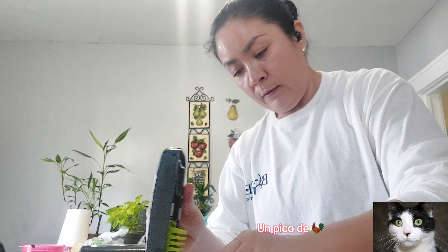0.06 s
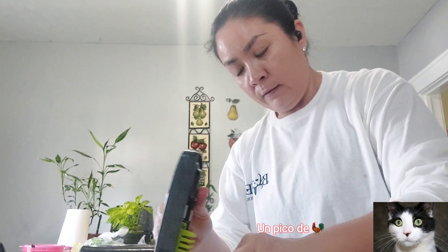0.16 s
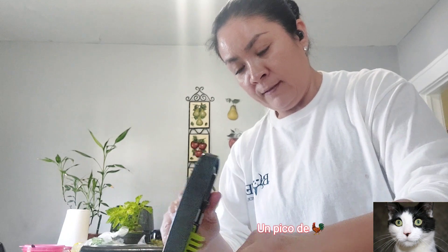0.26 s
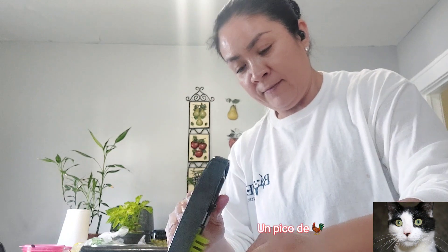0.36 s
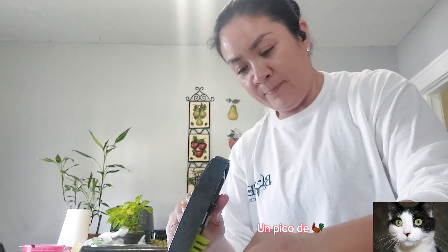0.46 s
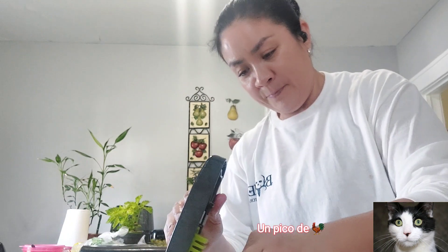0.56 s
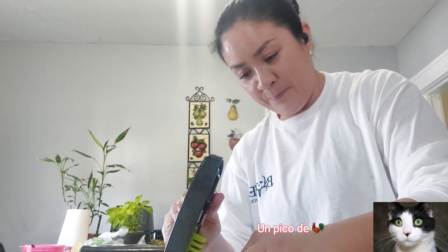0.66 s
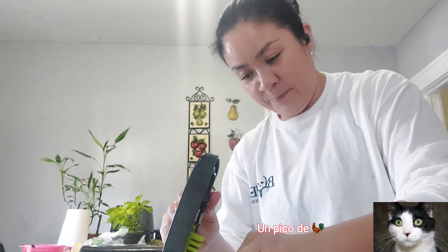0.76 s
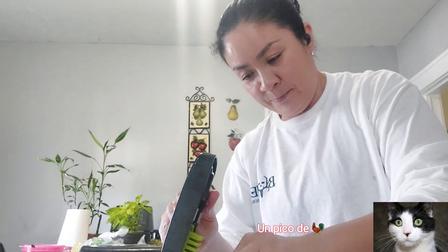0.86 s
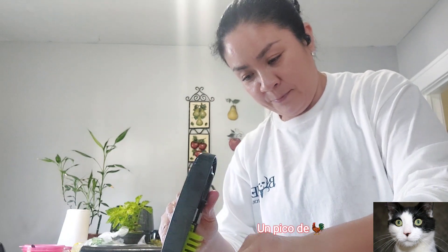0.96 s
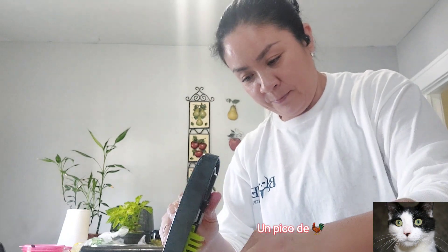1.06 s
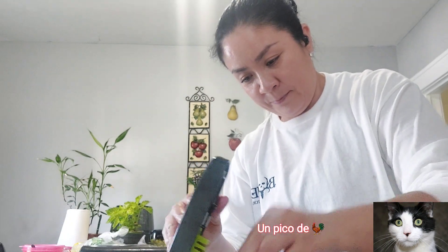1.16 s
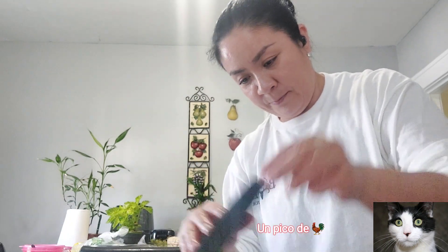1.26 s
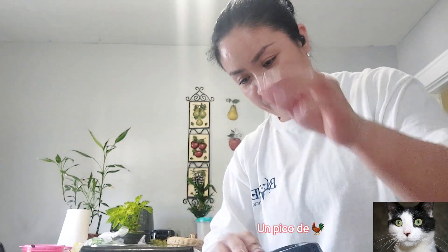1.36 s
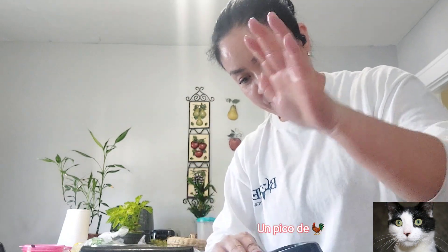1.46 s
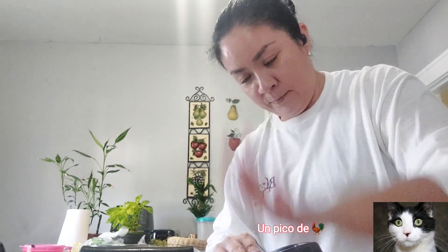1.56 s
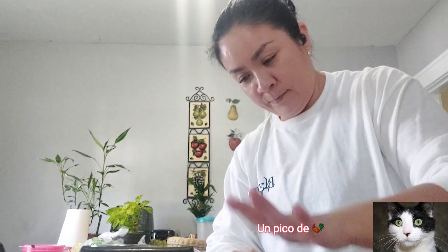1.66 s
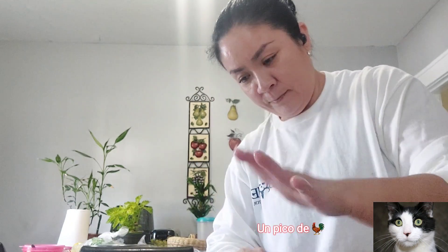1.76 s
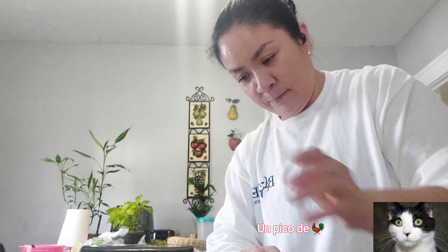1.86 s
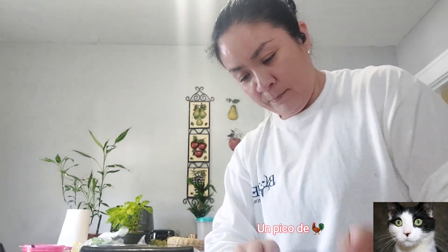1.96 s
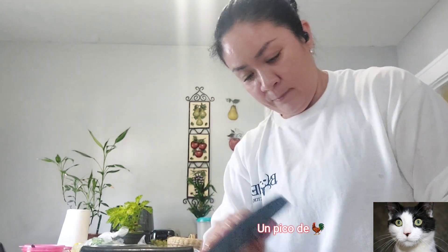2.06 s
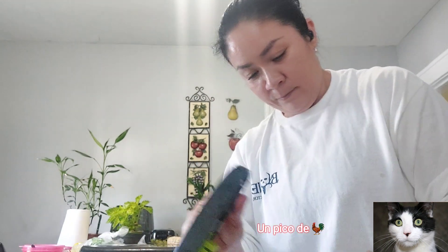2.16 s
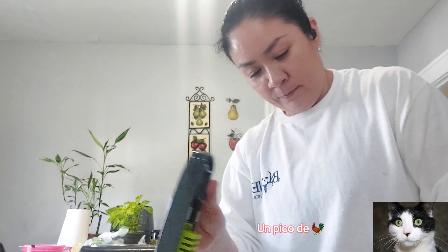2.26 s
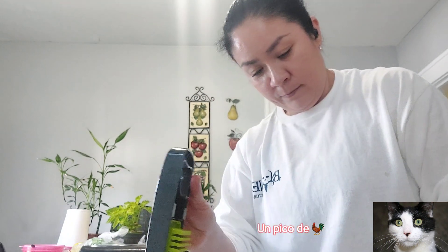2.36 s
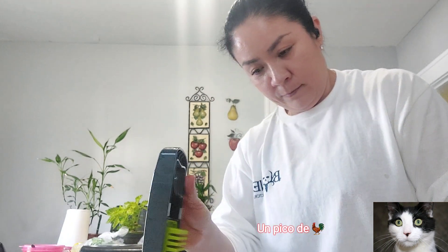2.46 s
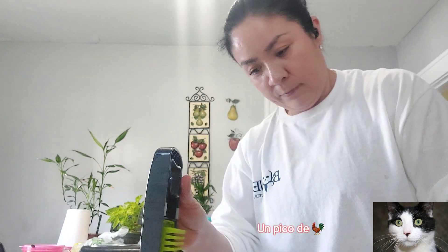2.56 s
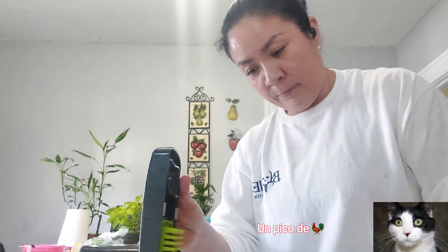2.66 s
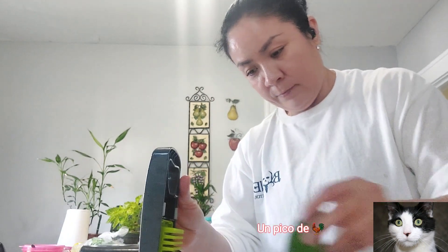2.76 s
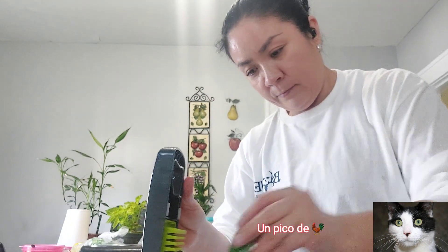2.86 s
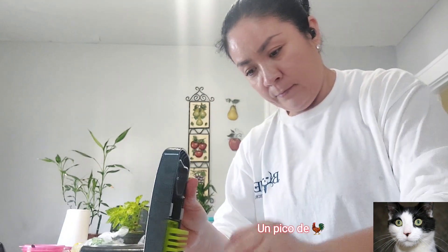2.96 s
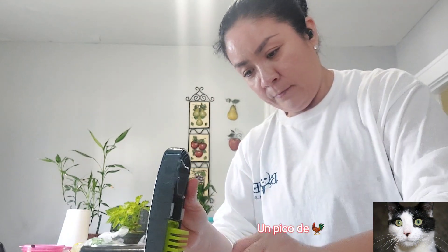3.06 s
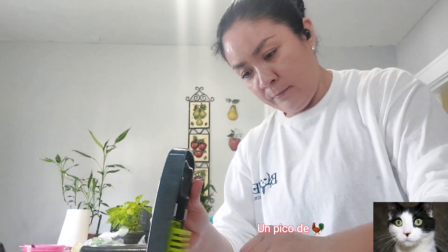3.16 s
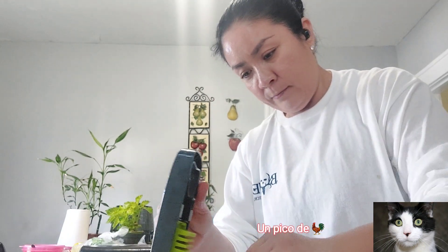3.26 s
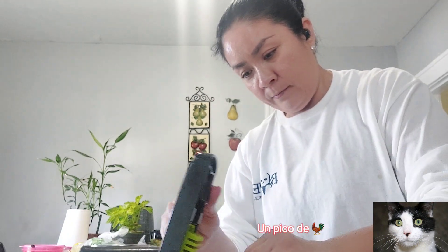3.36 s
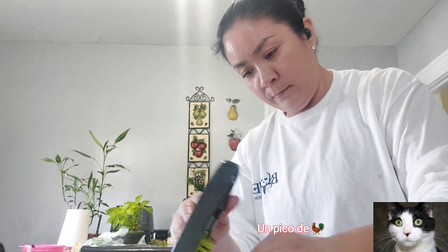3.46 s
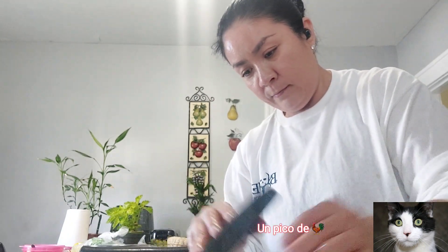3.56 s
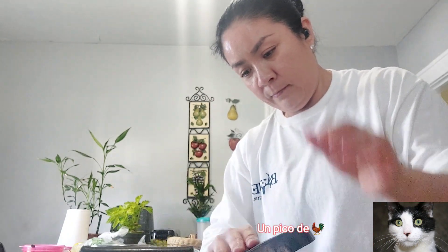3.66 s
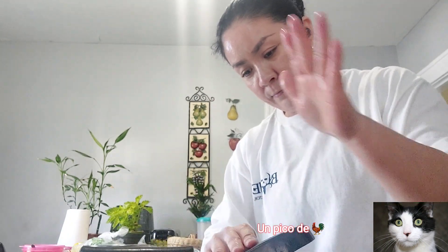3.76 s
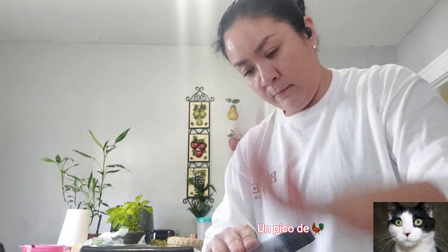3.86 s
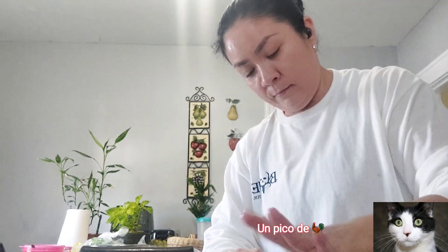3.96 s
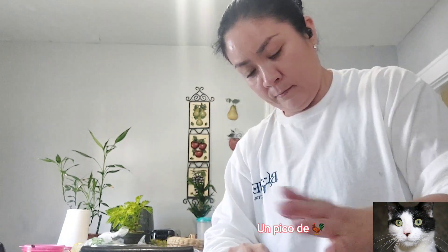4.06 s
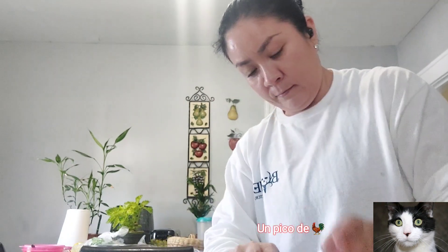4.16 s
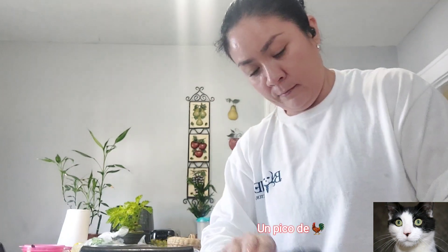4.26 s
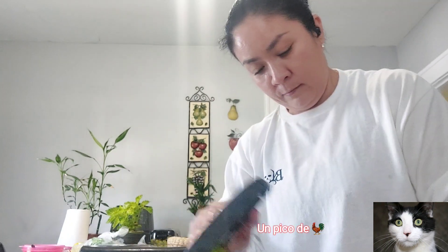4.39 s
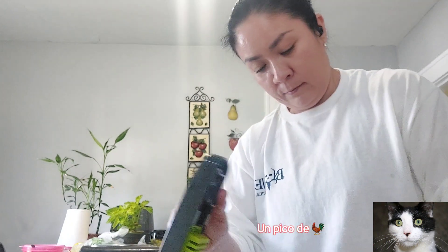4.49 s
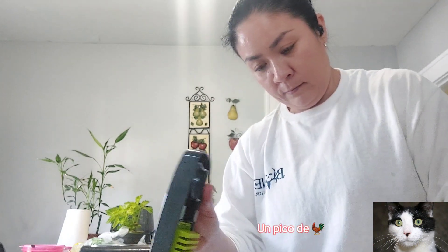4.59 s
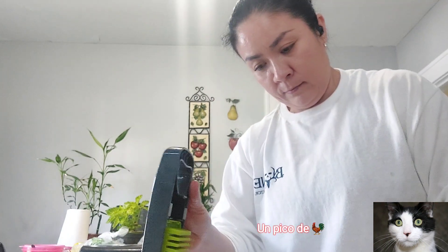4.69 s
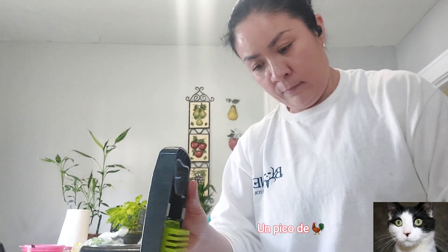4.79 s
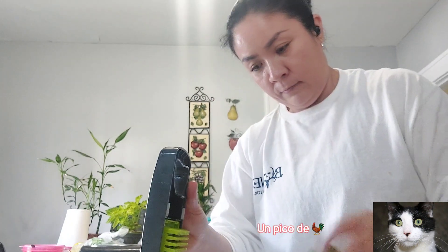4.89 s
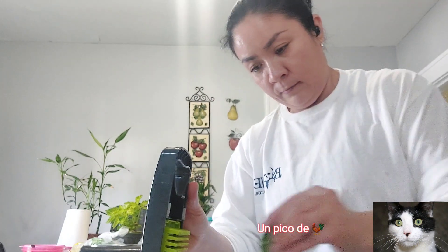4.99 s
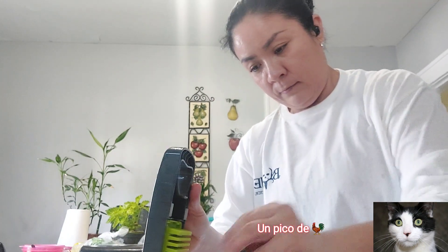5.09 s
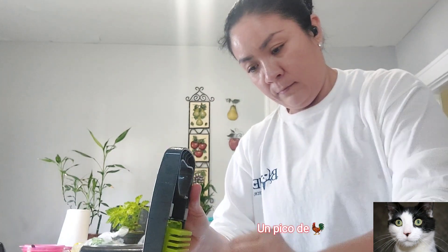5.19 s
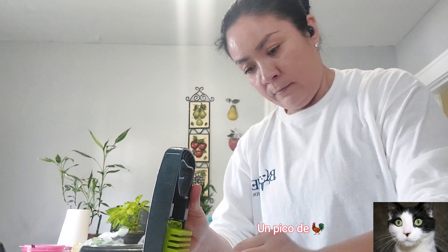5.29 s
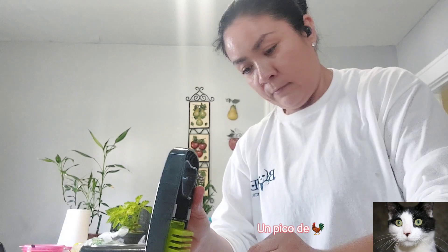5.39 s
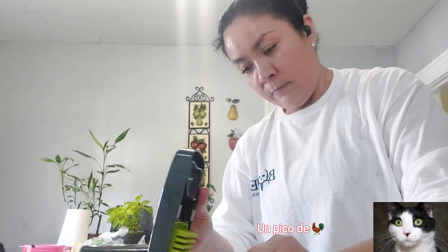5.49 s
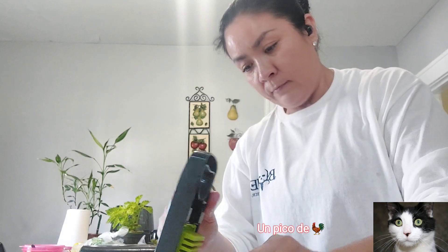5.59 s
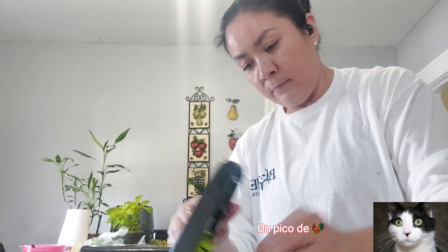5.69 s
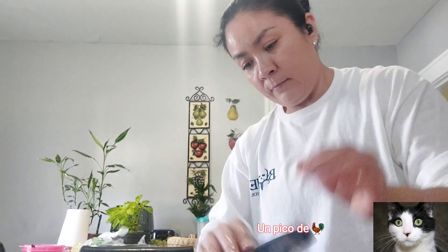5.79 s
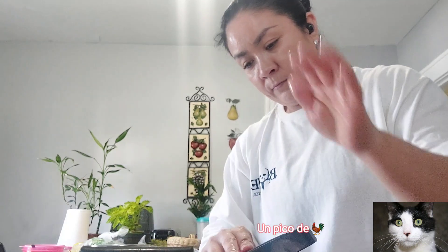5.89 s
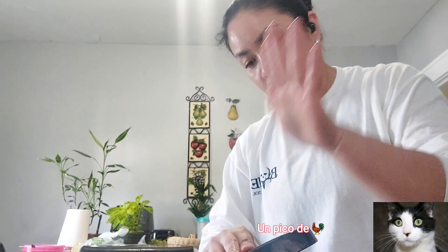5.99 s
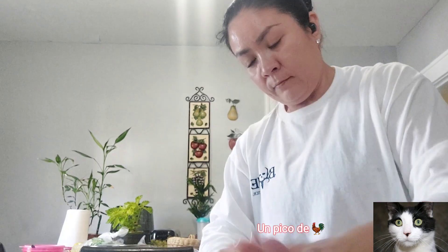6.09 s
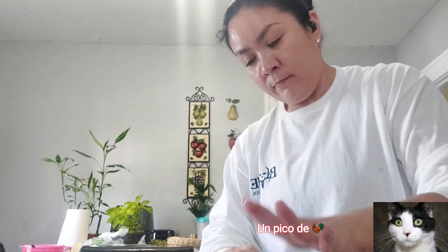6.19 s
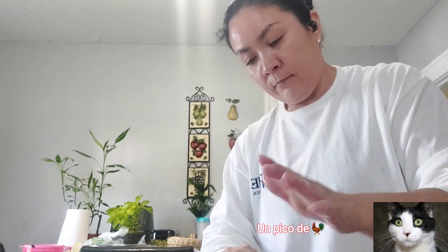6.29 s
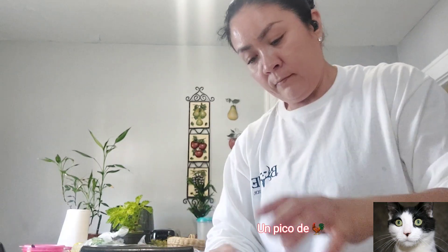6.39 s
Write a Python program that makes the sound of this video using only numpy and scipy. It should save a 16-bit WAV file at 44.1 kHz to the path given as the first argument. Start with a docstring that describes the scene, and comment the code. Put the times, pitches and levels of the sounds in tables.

```python
"""Chopping vegetables in a kitchen

Pieces are laid on the blade grid of a plastic lever chopper. Three times the lid is lowered and
slapped shut: palm, crunch, and the clack of the lid on its frame. The lid rattles as it is lifted.
The counter booms, something hollow on it rings on, the room reverberates and an appliance hums."""
import sys
import numpy as np
from scipy import signal
from scipy.fft import rfft, irfft
from scipy.io import wavfile
from scipy.ndimage import uniform_filter1d

SR = 44100
rng = np.random.default_rng(int(sys.argv[2]) if len(sys.argv) > 2 else 0)


def wav_record(signal):
    """Record a signal, one row per channel, as 16-bit PCM in the file named by sys.argv[1]."""
    frames = np.transpose(np.atleast_2d(signal))
    bounded = np.clip(frames, -1, 1)
    # unit amplitude maps onto the largest positive 16-bit level
    quanta = np.round(bounded * 32767).astype(np.int16)
    wavfile.write(sys.argv[1], SR, quanta)


N = 284004
TIME = np.arange(N) / SR
AGE = TIME[:SR * 3 // 5]  # seconds since a hit


def from_db(db):
    """Turn decibels into a gain to multiply by."""
    return 10 ** (np.asarray(db) / 20)


def unit_power(x):
    """Scale a signal to an average power of 1."""
    return x / np.sqrt(np.mean(x ** 2) + 1e-20)


def at_hz(table, hz, column=1):
    """Look up a frequency in a table, blending between its rows."""
    table = np.array(table)
    return np.interp(np.log(np.maximum(hz, 1)), np.log(table[:, 0]), table[:, column])


def add(out, time, sound):
    """Mix a sound in, starting at a time in seconds."""
    start = round(time * SR)
    out[:, start:start + sound.shape[-1]] += sound[..., :N - start]


def panned(db):
    """Two gains that make the left side db louder than the right."""
    return from_db(np.array([[db], [-db]]) / 2)


def stereo(mid, side, likeness):
    """Blend two unrelated signals into left and right (likeness 1 = same, -1 = opposite)."""
    likeness = np.clip(likeness, -1, 1)
    shared, apart = np.sqrt(1 + likeness) * mid, np.sqrt(1 - likeness) * side
    return np.array([shared + apart, shared - apart]) / np.sqrt(2)


def flicker(rate):
    """A random wobble of size about 1 that changes rate times a second."""
    return np.interp(TIME * rate, np.arange(20000), rng.standard_normal(20000))


def fade(ring_time, t=AGE):
    """Die away by 60 dB over the ring time."""
    return np.exp(-np.log(1000) * t / ring_time)


def tone(hz, ring_time, t=AGE):
    """One fading tone of a struck object."""
    return np.sin(2 * np.pi * hz * t) * fade(ring_time, t)


def rise(seconds):
    """A soft start, about two thirds of the way up after the given time."""
    return 1 - np.exp(-AGE / seconds)


def swell(time, width):
    """A short bell-shaped swell around a time."""
    out, near = np.zeros(N), np.abs(TIME - time) < 10 * width
    out[near] = np.exp(-.5 * ((TIME[near] - time) / width) ** 2)
    return out


# how alike a noise is on the left and right: (frequency [Hz], likeness [-1 to 1])
LIKENESS = [(60, 0.52), (600, .85), (1000, 0.12), (1450, -0.52), (2000, -0.084), (2800, 0.36),
            (5000, 0.039), (16000, 0.33)]

def noise(colour):
    """Steady stereo noise of power 1, shaped by a table of frequencies and levels."""
    hz = np.fft.rfftfreq(N, 1 / SR)
    mid, side = rfft(rng.standard_normal((2, N))) * from_db(at_hz(colour, hz))
    return unit_power(irfft(stereo(mid, side, at_hz(LIKENESS, hz)), N))


# the appliance's tones: (pitch [Hz], level [dB])
HUM_TONES = [(59.3, -64), (116.2, -64.5), (124.3, -63), (242, -74), (344.5, -73), (479, -79)]
# the room's low rush: (frequency [Hz], relative level [dB])
AIR_COLOUR = [(30, -19.5), (60, -5), (85, -11.5), (125, -2.5), (180, -15.5), (260, -11), (520, -23.5),
              (900, -28), (1700, -38), (4000, -44.5), (8000, -43.5), (16000, -45.5)]
# the recorder's noise suppressor, with dips at set times after the loud sounds: (time [s], gain [dB])
SUPPRESSOR_GAIN = [(0, -2), (.5, 0.5), (1.3, 0.5), (2.2, -2), (2.65, -9), (2.95, -8), (3.2, 1), (3.6, 1),
                   (4.4, -3), (4.85, -7.5), (5.15, -9.5), (5.4, -2), (5.8, 3.5), (6.44, -1.5)]

def background(air_db=-58.5, waver_db=0.5):
    """A steady appliance hum and room rush, briefly turned down by the recorder's noise suppressor."""
    hum = 0
    for hz, db in HUM_TONES:
        strength = np.sqrt(2) * from_db(db + waver_db * flicker(12))
        hum += strength * np.sin(2 * np.pi * hz * TIME + .5 * flicker(3.1))
    suppressor = from_db(np.interp(TIME, *np.transpose(SUPPRESSOR_GAIN)))
    return suppressor * (hum * panned(15.0) + from_db(air_db) * noise(AIR_COLOUR) * panned(1.4))


# nearby walls and ceiling: (delay [s], level [dB], left over right [dB])
WALL_ECHOES = [(.0029, -18, -2.5), (0.0108, -14, 3), (0.0342, -18.5, 1.5), (.047, -19.5, 2)]

def echoes(dry):
    """The sound bounces once off each of the nearest surfaces."""
    mono = dry.mean(axis=0)
    return sum(from_db(db) * np.interp(TIME - delay, TIME, mono, left=0) * panned(pan_db)
               for delay, db, pan_db in WALL_ECHOES)


# the kitchen's reverb:
# (frequency [Hz], relative level [dB], ring time [s], likeness [-1 to 1], left over right [dB])
KITCHEN_REVERB = [(205, -2, 0.65, 0.86, 3.5), (510, -9.5, 0.31, 0.7, 2.5), (1003, -2, 0.42, 0.71, 3),
                  (1350, -0.5, .39, -1.8, -0.5), (2000, 1, .42, 0.46, 3), (2760, -2, 0.45, 0.75, 6),
                  (3480, -2, 0.49, -0.03, 9.5), (5070, 1, 0.44, -0.63, 10.5),
                  (7985, -0.5, 0.49, 0.079, 2.5), (15000, -1.5, 0.4, -0.32, -1)]

def reverb(dry, gap_s=0.011, level_db=-2.0):
    """The room stores each frequency band's energy and lets it leak away as a wash of echoes."""
    edges, out = np.geomspace(170, 17000, 21), 0
    white = rng.standard_normal((2, 2, N))  # neighbouring bands get unrelated noise
    source = np.interp(TIME - gap_s, TIME, dry[0], left=0) + 1e-12 * white[0, 0]
    for k, (low, high) in enumerate(zip(edges, edges[1:])):
        centre_hz = np.sqrt(low * high)
        db, ring_time, likeness, pan_db = (at_hz(KITCHEN_REVERB, centre_hz, c) for c in range(1, 5))
        band = signal.butter(2, [low, high], "band", fs=SR, output="sos")
        kept = fade(ring_time, 2 / SR)  # energy left after one sample
        stored = signal.lfilter([1 - kept], [1, -kept], signal.sosfilt(band, source) ** 2)
        wash = unit_power(stereo(*signal.sosfilt(band, white[k % 2]), likeness))
        out += from_db(db + level_db) * np.sqrt(stored) * wash * panned(pan_db)
    return out


def rim_coloured(wet, lift_db=5.5, width_hz=35, level_db=-1.5):
    """The reverb is strongest at the pitches that the lid's rim feeds into the room."""
    peaks = sum(signal.lfilter(*signal.iirpeak(hz, hz / width_hz, fs=SR), wet) for hz, _, _ in RIM_TONES)
    return from_db(level_db) * (wet + (from_db(lift_db) - 1) * peaks)


def vessel(level_db=-35.5, low_hz=243.2, split_hz=2.1, ring_time=2.0):
    """Each slap shakes a hollow vessel; its two close tones drift into step, so the ring swells."""
    out = np.zeros((2, N))
    ring = tone(low_hz, ring_time, TIME) - tone(low_hz + split_hz, ring_time, TIME)
    for time, db, travel in SLAPS:
        add(out, time + travel, from_db(db + level_db) * ring)
    return out * panned(3.0)


# the counter, things on it and the room's low notes: (pitch [Hz], level [dB], ring time [s])
COUNTER_TONES = [(66, -9.5, 0.49), (91, -10, 0.38), (108.2, 1.5, .38), (127, -9, 0.38), (159.2, -1, 0.33),
                 (213.6, -4.5, 0.39), (283.4, -14, 0.67), (520, -10, 0.38), (937, -14.5, 0.15),
                 (1101.6, -17.5, .3)]

def counter(swell_s=0.0044, level_db=-1.5):
    """Blows pass through the chopper's base; the heavy counter takes a moment to start booming."""
    thumps = [(time + .75 * travel, db - 9.5) for time, db, travel in SLAPS]  # late in the lid's fall
    thumps += [(time, db - 8.5 + .7 * hardness) for time, db, _, hardness in LIGHT_KNOCKS]
    thumps += [(time, db - 10) for time, db in HINGE_BUMPS]
    boom = rise(swell_s) * sum(from_db(db) * tone(hz, ring_time) for hz, db, ring_time in COUNTER_TONES)
    out = np.zeros((2, N))
    for time, db in thumps:
        add(out, time, from_db(db + level_db) * boom)
    return out * panned(6.6)


# pieces shifting on the grid: (middle time [s], width [s], level [dB], hiss against that level [dB])
SCUFFS = [(0.044, 0.02, -60, -9), (.168, .0085, -45.5, -20), (0.526, 0.036, -56, -13.5),
          (0.887, 0.02, -51.5, -8.5), (0.957, 0.052, -65, -7), (1.16, 0.03, -71.5, 4),
          (3.056, 0.01, -50, -11), (3.467, 0.023, -59, -28), (4.358, .007, -50.5, -25.5),
          (5.242, 0.015, -55, -13.5), (5.344, 0.016, -59.5, -16.5), (5.54, 0.035, -54.5, -9),
          (5.767, 0.016, -63.5, -3.5)]
# the vegetable's dull pulp and its bright hiss: (frequency [Hz], relative level [dB])
PULP_COLOUR = [(120, -14.5), (350, -5), (520, 5), (750, -5), (1100, -17.5), (1600, -22), (3000, -38.5),
               (8000, -51)]
HISS_COLOUR = [(1000, -12), (2700, -3), (5000, -7), (9000, -7), (13000, 3), (16000, 7)]

def scuffs(grain_db=5.0):
    """Vegetable pieces rub over the blades in short uneven strokes."""
    pulp, hiss = np.zeros((2, N))
    for time, width, db, hiss_db in SCUFFS:
        stroke = from_db(db) * swell(time, width)
        pulp += stroke
        hiss += from_db(hiss_db) * stroke
    grains = from_db(grain_db * flicker(300))
    return grains * (pulp * noise(PULP_COLOUR) + hiss * noise(HISS_COLOUR)) * panned(3.7)


# the plastic shell: (pitch [Hz], level [dB], ring time [s])
SHELL_TONES = [(294.6, -10.5, 0.09), (351.5, -19.5, 0.18), (462, -18, 0.21), (530.2, -19.5, 0.22),
               (618, -9, 0.061), (737, -10.5, 0.033)]

def knock(flex_hz, flex_db=4.0, shell_db=-4.5, contact_s=.0022, scatter_db=1.0, samples=14000):
    """The lid flexes at a pitch set by the grip; every hit rings the shell's tones in a new mix."""
    t = AGE[:samples]
    flex = tone(flex_hz, ring_time=.022, t=t)
    shell = sum((-1) ** k * from_db(db + scatter_db * rng.standard_normal()) * tone(hz, ring_time, t)
                for k, (hz, db, ring_time) in enumerate(SHELL_TONES))
    return (from_db(flex_db) * flex + from_db(shell_db) * shell) * rise(contact_s)[:samples]


# the lid's stiff rim and ribs: (pitch [Hz], level [dB], ring time [s])
RIM_TONES = [(940, -0.5, 0.057), (1107, -3.5, 0.045), (1192, -3, 0.084), (1916, -14, 0.089),
             (2130, -15.5, 0.051), (3460, -17.5, 0.027)]

def clack(detune=0.0098, scatter_db=2.5, samples=6000):
    """The hand presses on the rim differently at every hit, shifting its tones a little."""
    out = 0
    for k, (hz, db, ring_time) in enumerate(RIM_TONES):
        gain = from_db(db + scatter_db * rng.standard_normal())
        pitch = hz * (1 + detune * rng.standard_normal())
        out += (-1) ** k * gain * tone(pitch, ring_time, AGE[:samples])
    return out


# loading, lowering and lifting; hardness 0 is bare plastic, -40 is cushioned:
# (time [s], level [dB], pitch [Hz], hardness [dB])
LIGHT_KNOCKS = [(1.36, -24.5, 703, -9.5), (1.375, -17.5, 394, -16.5), (1.395, -21.5, 584, -9.5),
                (1.413, -21.5, 340, -23.5), (1.931, -24.5, 406, -26), (1.978, -20.5, 377, -25.5),
                (2.007, -10.5, 475, -20.5), (2.029, -22, 318, -31), (2.052, -26, 467, -30),
                (2.102, -19.5, 388, -23), (2.224, -20.5, 480, -31.5), (2.544, -50, 453.3, -16),
                (3.042, -34, 695, -28.5), (3.212, -24, 522, -31), (3.326, -32, 478, -21),
                (3.662, -39.5, 618, -6), (3.671, -14.5, 727, -20.5), (3.709, -24, 329, -26.5),
                (4.245, -35.5, 460, -8.5), (4.282, -22.5, 420, -20), (4.289, -13, 520, -22),
                (4.547, -41, 477, -28), (4.591, -41, 530, -20.5), (5.229, -40, 480, -30),
                (5.512, -31, 463.5, -35), (5.557, -34, 452, -16.5), (5.813, -23, 720, -13),
                (5.822, -18, 460, -21.5), (5.858, -13.5, 474, -31.5), (5.938, -30, 480, -40)]
# the raised lid bumps its hinge stop: (time [s], level [dB])
HINGE_BUMPS = [(2.474, -35.5), (4.718, -35)]

def light_hits(hinge_hz=441.6, hinge_hardness_db=-18.5, chatter_s=0.0068):
    """Handling knocks the plastic; the harder the knock, the more it clacks and cracks."""
    bumps = [(time, db, hinge_hz, hinge_hardness_db) for time, db in HINGE_BUMPS]
    for time, db, hz, hardness in list(LIGHT_KNOCKS) + bumps:
        clack_db = db - 4 + 0.57 * hardness
        treble_db = db - 10.5 + 1.3 * hardness
        yield time, db, hz, clack_db, db + hardness, treble_db, chatter_s


# the palm slams the lid shut: (time [s], level [dB], travel time to the frame [s])
SLAPS = [(1.633, -5.5, .017), (3.931, -5, 0.021), (6.0856, -5, .023)]
# the four hits in a slap, with levels against the slap's own:
# (share of travel time, knock [dB], pitch [Hz], clack [dB], crack [dB], treble [dB], chatter time [s])
SLAP_STAGES = [(0, 0.5, 512, -20.5, -18, -33.5, .0026), (.3, -3, 570, -27.5, -24, -44, .0026),
               (.95, -4, 540, -15, -11, -20.5, 0.0075), (1.2, -9.5, 420, -20.5, -14, -25.5, .004)]

def slap_hits():
    """The palm lands, then the lid meets the vegetable, hits its frame and bounces."""
    for time, db, travel in SLAPS:
        for share, knock_db, hz, clack_db, crack_db, treble_db, chatter_s in SLAP_STAGES:
            start = time + share * travel
            yield start, db + knock_db, hz, db + clack_db, db + crack_db, db + treble_db, chatter_s


# the lowered lid squeezes the vegetable before each slap: (middle time [s], width [s], level [dB])
PRESSES = [(1.394, 0.017, -31.5), (3.677, 0.0079, -34.5), (5.834, 0.016, -38.5)]

def blade_bites(press_db=(-1, -12.5, -15), cut_db=(-11.5, -13.5, -27), cut_width_s=.0054):
    """Blades nick at each press and cut halfway through each slap: pulp, crack and treble over time."""
    bites = [(time, width, np.add(db, press_db)) for time, width, db in PRESSES]
    bites += [(time + travel / 2, cut_width_s, np.add(db, cut_db)) for time, db, travel in SLAPS]
    return sum(np.outer(from_db(levels), swell(time, width)) for time, width, levels in bites)


# the crunch's sharp crack and fine treble: (frequency [Hz], relative level [dB])
CRACK_COLOUR = [(150, -16), (400, 9), (1100, 6), (1550, -6), (2000, -3.5), (2800, -6), (3400, -5.5),
                (4500, -15), (6500, -26.5), (12000, -45)]
TREBLE_COLOUR = [(1500, -17), (4200, 0), (6000, 4), (8200, 0.5), (9600, -5.5), (12000, 0.5), (16000, -1)]

def chopper(knock_gain_db=3.5, clack_gain_db=-3.0, treble_gain_db=1.5, grain_db=3.5, attack_s=0.00029):
    """Each hit knocks the shell, clacks the rim and makes the plastic chatter; the blades crunch."""
    shell, rim, crack, treble = np.zeros((4, 2, N))
    for time, knock_db, hz, clack_db, crack_db, treble_db, chatter_s in [*slap_hits(), *light_hits()]:
        add(shell, time, from_db(knock_db + knock_gain_db) * knock(hz))
        clacks = np.array([clack(), clack()])  # each side faces another part of the rim
        add(rim, time, from_db(clack_db + clack_gain_db) * clacks)
        chatter = rise(attack_s) * np.exp(-AGE / chatter_s)
        add(crack, time, from_db(crack_db) * chatter)
        add(treble, time, from_db(treble_db + treble_gain_db) * chatter)
    pulp, blade_crack, blade_treble = blade_bites()
    grains = from_db(grain_db * flicker(1500))  # tiny fractures of uneven size
    crunch = pulp * noise(PULP_COLOUR) * panned(11.0)
    crunch += (crack + blade_crack) * noise(CRACK_COLOUR) * panned(8.4)
    crunch += (treble + blade_treble) * noise(TREBLE_COLOUR) * panned(0.53)
    return shell * panned(3.5) + rim * panned(1.5) + grains * crunch


def scene():
    """The chopper on its counter in the kitchen."""
    dry = chopper() + scuffs()
    return background() + echoes(dry) + rim_coloured(reverb(dry)) + vessel() + counter() + dry


def hiss_reducer(x, split_hz=1400, threshold_db=-57.0, depth_db=7.5):
    """The highs are turned down whenever they are faint, which shortens the quiet tails."""
    highs = signal.sosfiltfilt(signal.butter(2, split_hz, "high", fs=SR, output="sos"), x)
    power = np.abs(uniform_filter1d(np.mean(highs ** 2, axis=0), size=500))
    faintness = 1 / (1 + power / from_db(threshold_db) ** 2)
    return x + highs * (from_db(-depth_db * faintness) - 1)


# colour of a microphone close to the counter: (frequency [Hz], width [Hz], boost [dB])
MICROPHONE_COLOUR = [(1160, 290, -0.5), (1390, 1000, 0), (1890, 790, 3), (2840, 340, -1), (3200, 390, 1)]

def record(dry, low_cut_hz=50, high_cut_hz=15950):
    """The microphone colours the sound and loses faint hiss and the very top. Nothing sounds below about 50 Hz."""
    heard = signal.sosfilt(signal.butter(2, low_cut_hz, "high", fs=SR, output="sos"), dry)
    for hz, width_hz, db in MICROPHONE_COLOUR:
        band = signal.lfilter(*signal.iirpeak(hz, hz / width_hz, fs=SR), heard)
        heard += (from_db(db) - 1) * band
    heard = hiss_reducer(heard)
    rounded = .91 * heard / (1 + heard ** 6) ** (1 / 6)  # softens the loudest peaks
    return signal.sosfilt(signal.ellip(10, .1, 80, high_cut_hz, fs=SR, output="sos"), rounded)


dry = scene()
out = record(dry)
wav_record(out)
```